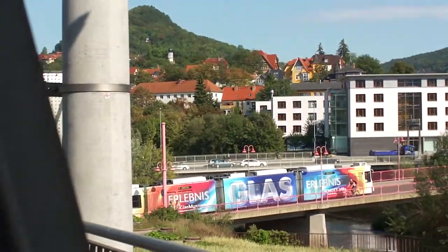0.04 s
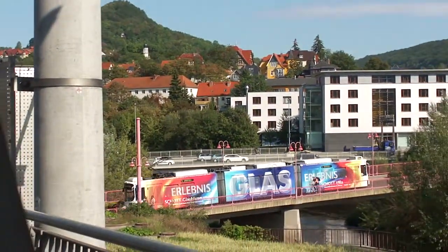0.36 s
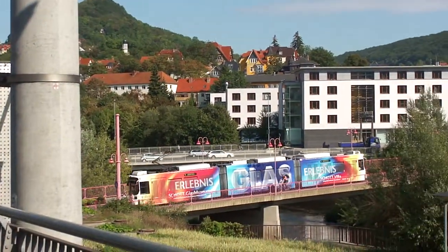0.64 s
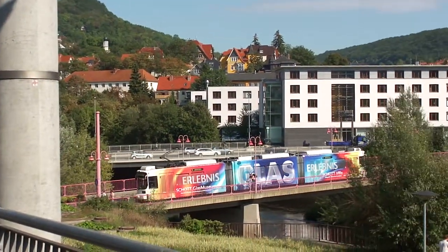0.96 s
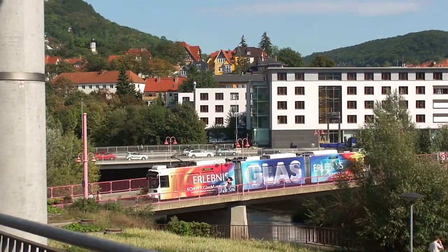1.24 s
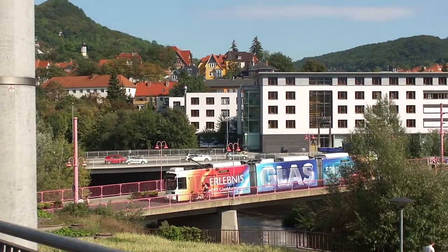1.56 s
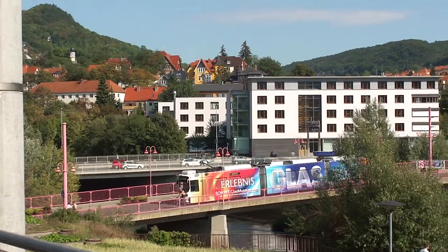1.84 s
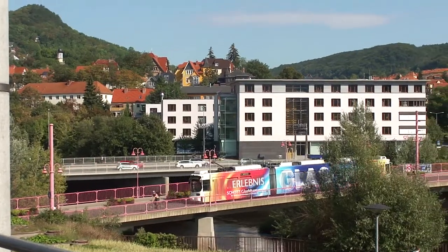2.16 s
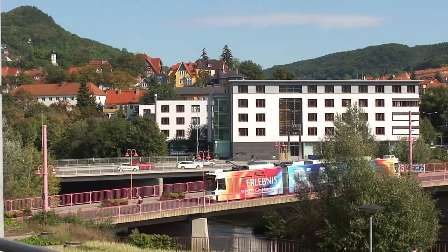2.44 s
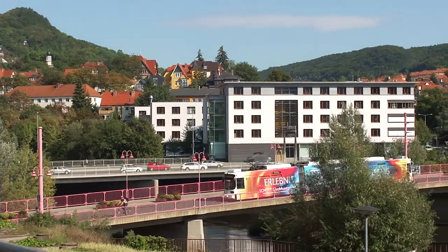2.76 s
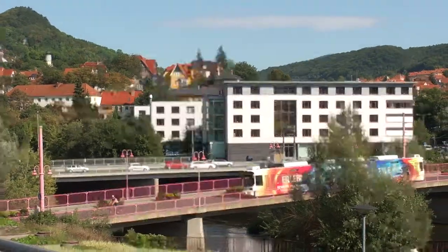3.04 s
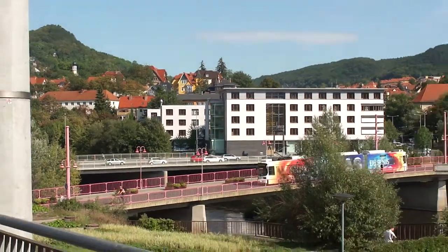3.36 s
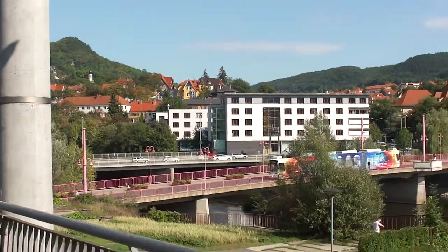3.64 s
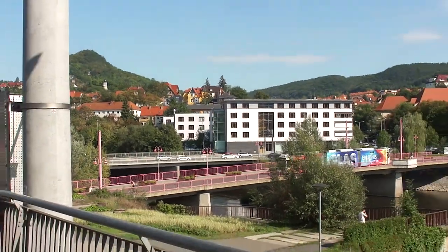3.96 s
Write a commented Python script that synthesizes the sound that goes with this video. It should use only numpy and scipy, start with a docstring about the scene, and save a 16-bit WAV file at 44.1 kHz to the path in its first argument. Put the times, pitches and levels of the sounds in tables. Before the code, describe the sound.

Distant traffic and a tram roar steadily, with one small double click up close.

```python
"""Town traffic across a river

Far-off traffic and a tram on a bridge: an even roar of tyres and wheels over a low engine drone,
with a faint motor whine and thin, high singing. Up close, something small and hard clicks twice,
press and release, and later a hand brushes the microphone's housing. The microphone hisses softly
and has three narrow notches in the treble."""
import sys
import numpy as np
from scipy import signal
from scipy.fft import rfft, irfft, next_fast_len
from scipy.io import wavfile
from scipy.ndimage import uniform_filter1d, map_coordinates

SR = 44100
rng = np.random.default_rng(int(sys.argv[2]) if len(sys.argv) > 2 else 0)


def to_wav(sig):
    """Store sig (one row per channel, or 1-D mono) as 16-bit WAV at the path in sys.argv[1].

    Samples outside -1..1 are clipped; the rate is SR.
    """
    pcm = np.clip(np.atleast_2d(sig), -1, 1) * 32767
    pcm = np.round(pcm).astype(np.int16)
    wavfile.write(sys.argv[1], SR, pcm.T)  # frames by channels


N = 176400
T = np.arange(N) / SR


def amp(db):
    """Decibels to gain."""
    return 10 ** (np.asarray(db) / 20)


def unit(x):
    """Scale to rms 1."""
    return x / np.sqrt(np.mean(x ** 2) + 1e-20)


def along(points, hz):
    """Read a curve of (Hz, value) points on a log frequency axis."""
    freqs, values = np.transpose(points)
    return np.interp(np.log(hz + 1), np.log(freqs + 1), values)


def bell(x, centre, width):
    """A Gaussian hump of height 1; width is its standard deviation."""
    return np.exp(-.5 * ((x - centre) / width) ** 2)


def wobble(rate):
    """A smooth random curve, rate knots a second."""
    knots = rng.standard_normal(int(N * rate / SR) + 4)
    return map_coordinates(knots, [T * rate], mode="nearest")


def filtered(x, response):
    """Zero-phase EQ: response gives the gain at each frequency."""
    size = next_fast_len(N + SR // 2)
    return irfft(rfft(x, size) * response(np.fft.rfftfreq(size, 1 / SR)), size)[..., :N]


def rush(colour, coherence, patchy_db=0):
    """Stereo noise of rms 1: colour is its EQ, coherence narrows its image, patchy_db mottles it."""
    spectra = signal.stft(rng.standard_normal((2, N)), nperseg=1024)[2]
    patches = uniform_filter1d(rng.standard_normal(spectra.shape[1:]), size=7, axis=0)
    patches = unit(uniform_filter1d(patches, size=12, axis=1))
    pair = signal.istft(spectra * amp(patchy_db * patches), nperseg=1024)[1][:, :N]
    spread = lambda hz: np.arccos(np.clip(along(coherence, hz), -1, 1)) / 2
    mid, side = filtered(pair, lambda hz: colour(hz) * np.array([np.cos(spread(hz)), np.sin(spread(hz))]))
    return unit(np.array([mid + side, mid - side]))


# Tone of the hiss (frequency [Hz], relative level [dB])
HISS_SPECTRUM = [(1500, -29), (2700, -6.5), (3400, 0.5), (4500, -5), (6100, 3), (7500, -1.5), (9000, -5),
                 (10200, -10.5), (11100, -21.5), (11800, -36), (14000, -42)]
# Stereo image of the hiss, brush and singing (frequency [Hz], left-right coherence [0-1])
TREBLE_COHERENCE = [(3000, 0.47), (6000, 0.35), (10000, 0.21)]

def microphone_hiss(level_db=-58):
    """The microphone's own noise: a soft, even bed of treble."""
    return amp(level_db) * rush(lambda hz: amp(along(HISS_SPECTRUM, hz)), TREBLE_COHERENCE, patchy_db=1.5)


# Tone of the scuff (frequency [Hz], relative level [dB])
BRUSH_SPECTRUM = [(2000, -20), (3500, 4), (7000, 7), (10200, -3), (12000, -32)]

def hand_brush(peak_s=3.05, width_s=.02, level_db=-55.5):
    """A hand rubs lightly over the housing: one short, bright scuff."""
    friction = rush(lambda hz: amp(along(BRUSH_SPECTRUM, hz)), TREBLE_COHERENCE)
    return amp(level_db) * bell(T, peak_s, width_s) * friction


# High tones (peak time [s], length [s], pitch [Hz], bandwidth [Hz], level [dB])
SINGING_TONES = [(.59, 0.18, 6083, 32, -63), (1.0, .12, 6083, 90, -72), (1.172, .03, 7430, 260, -61),
                 (3.68, .35, 6760, 500, -66)]

def high_singing():
    """Thin tones swell and fade, perhaps wheels singing on the rails."""
    return sum(amp(db) * bell(T, peak_s, length / 2)
               * rush(lambda hz: bell(hz, pitch, bandwidth / 2), TREBLE_COHERENCE)
               for peak_s, length, pitch, bandwidth, db in SINGING_TONES)


# Engine drone and tram motor whine (pitch [Hz], width [Hz], level [dB])
MOTOR_BANDS = [(60.5, 6.4, -71), (446, 16, -56)]
# Stereo image of the motors and the roar (frequency [Hz], left-right coherence [0-1])
TOWN_COHERENCE = [(50, 0.82), (150, 0.94), (550, 0.96), (1100, 0.94), (2000, 0.83), (2800, 0.76)]

def motors():
    """Engines and tram motors, blurred by distance into narrow, wavering bands."""
    return sum(amp(db) * rush(lambda hz: bell(hz, pitch, width), TOWN_COHERENCE)
               for pitch, width, db in MOTOR_BANDS)


# Modes of the hard part (frequency [Hz], press level [dB], release level [dB], t60 [s])
PART_MODES = [(2020, -7.5, -5.5, .011), (2480, -9, -10, .005), (3500, -21, -18, .003),
              (4550, -23, -15, .006), (5900, -6.5, -4.5, .0045), (6520, -20, -9, .009),
              (7050, .5, -9, .0036), (8750, -11, -12, .005), (9750, -8.5, -16, .0045),
              (10800, -8.5, -16, .003), (15000, -12, -26, .002)]
# Two clicks and three faint ticks (time [s], gain [dB], left over right [dB], press or release [0 or 1])
CONTACTS = [(1.4891, -11, 1, 0), (1.5368, -39, 0, 0), (1.5478, -29, -4, 0), (1.5492, -14.5, -5, 1),
            (1.562, -38, 0, 0)]

def clicks(attack_s=.0001, right_lag_s=.000025, low_cut_hz=1100):
    """A small part, perhaps a button: each contact cracks, rings it and rattles the housing."""
    out = np.zeros((2, N))
    for channel, side in enumerate((1, -1)):
        t = np.maximum(np.arange(SR // 10) / SR - channel * right_lag_s, 0)
        attack = 1 - np.exp(-t / attack_s)
        decay = lambda t60: amp(-60 * t / t60)
        mode = lambda hz, db, t60: amp(db + rng.normal(0, 1)) * decay(t60) * np.sin(2 * np.pi * hz * t)
        for start_s, gain_db, pan_db, release in CONTACTS:
            ring = sum(mode(hz, release_db if release else press_db, t60)
                       for hz, press_db, release_db, t60 in PART_MODES)
            noise = uniform_filter1d(rng.standard_normal(len(t)), size=3)
            crack = amp(-11) * decay(t60=.006) * noise
            rattle = amp(-34) * decay(t60=.06) * noise
            spring = release * mode(hz=13930, db=-42, t60=.06)  # thin ring as the part springs back
            contact = attack * (ring + crack + rattle + spring)
            out[channel, round(start_s * SR):][:len(t)] += amp(gain_db + side * pan_db / 2) * contact
    # So small a part radiates no bass.
    return signal.sosfilt(signal.butter(2, low_cut_hz, "high", fs=SR, output="sos"), out)


# Tone of the far tyres and wheels (frequency [Hz], relative level [dB])
ROAR_SPECTRUM = [(15, -69), (25, -39.5), (49, -34.5), (97, -23), (183, -8), (306, -4), (359, -5.5),
                 (447, -0.5), (780, -1.5), (1090, -0.5), (1500, -5.5), (1800, -6.5), (2200, -12),
                 (2570, -21.5), (2900, -35), (3770, -61.5), (6380, -120)]
# Fader ride of the passing traffic (time [s], level [dB])
TRAFFIC_FLOW = [(0, -32), (.4, -31.5), (.68, -31), (.77, -31.5), (.82, -30), (.885, -29), (.925, -31.5),
                (1.15, -31), (1.4, -32.5), (2.1, -32), (2.7, -32), (3.2, -31.5), (3.7, -32.5), (4, -32)]

def traffic_roar(shelf_hz=1100, shelf_db_per_db=.37, drift_db=.05):
    """Tyres and wheels merge into one far roar, louder and a little brighter as more of them pass."""
    flow_db = np.interp(T, *np.transpose(TRAFFIC_FLOW)) - drift_db * wobble(rate=6.5)
    roar = rush(lambda hz: amp(along(ROAR_SPECTRUM, hz)), TOWN_COHERENCE, patchy_db=.5)
    highs = filtered(roar, lambda hz: hz ** 2 / (hz ** 2 + shelf_hz ** 2))
    lows = roar - highs
    shelf_db = shelf_db_per_db * (flow_db - flow_db.mean())
    return amp(flow_db) * (lows + amp(shelf_db) * highs)


def scene():
    """The mix: the town a touch left, the hiss a touch right, the clicks and brush up close."""
    town = (traffic_roar() + motors() + high_singing()) * amp([[.12], [-.12]])
    hiss = microphone_hiss() * amp([[-.4], [.4]])
    return town + hiss + clicks() + hand_brush()


# The microphone's treble notches (frequency [Hz], width [Hz], depth [dB])
MIC_NOTCHES = [(3004, 68, 15.5), (3995, 139, 15.5), (5040, 127, 20)]
# Its falling top end (frequency [Hz], gain [dB])
MIC_TOP_END = [(11400, 0), (12000, -12), (14500, -10), (16000, -26)]

def record(dry, high_cut_hz=16000):
    """The microphone's colour: three narrow notches, a dull top and a steep high cut."""
    def response(hz):
        notch_db = sum(depth * bell(hz, centre, width) for centre, width, depth in MIC_NOTCHES)
        high_cut = 1 / np.sqrt(1 + (hz / high_cut_hz) ** 80)
        return amp(along(MIC_TOP_END, hz) - notch_db) * high_cut
    return filtered(dry, response)


dry = scene()
out = record(dry)
to_wav(out)
```